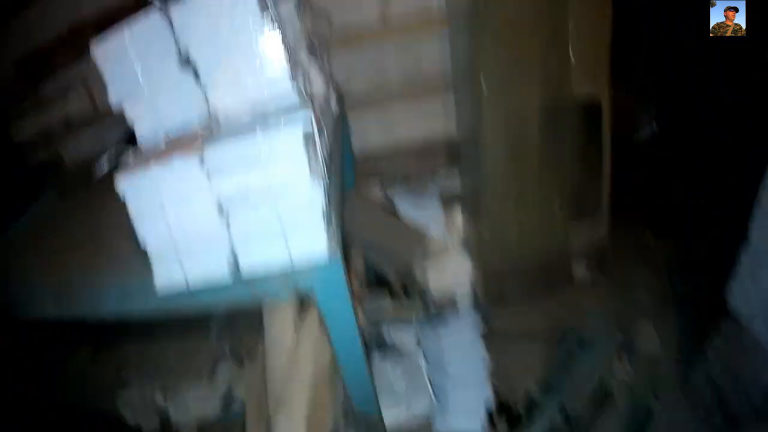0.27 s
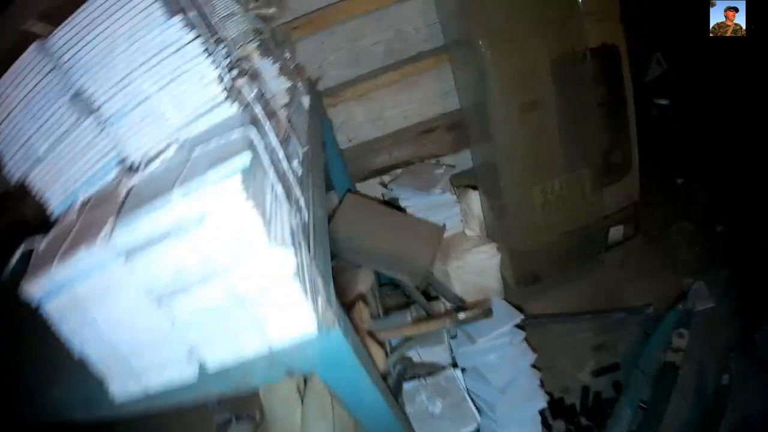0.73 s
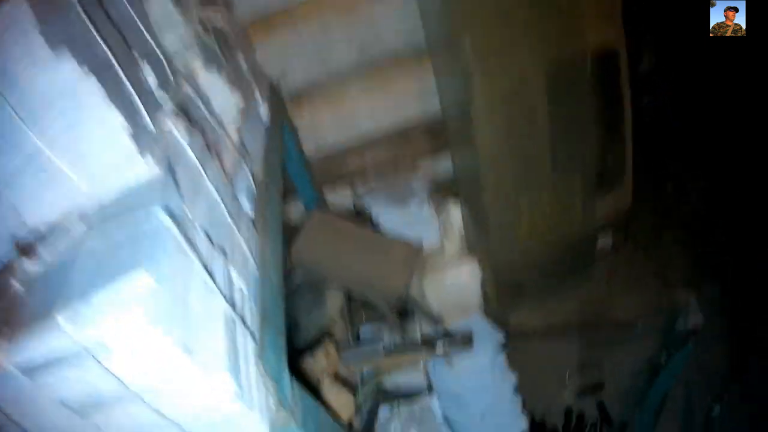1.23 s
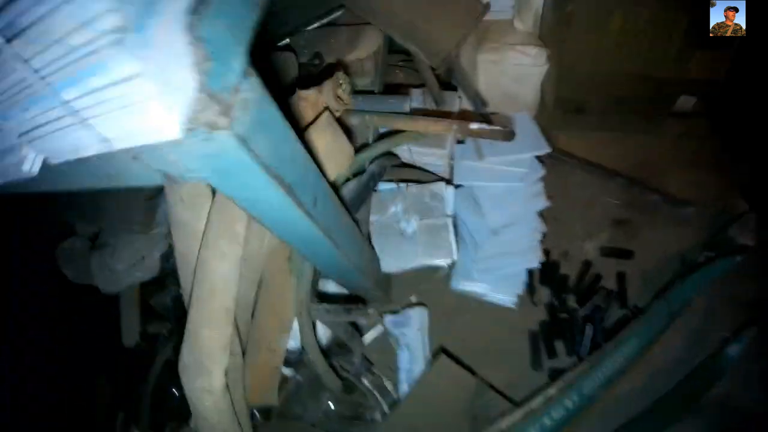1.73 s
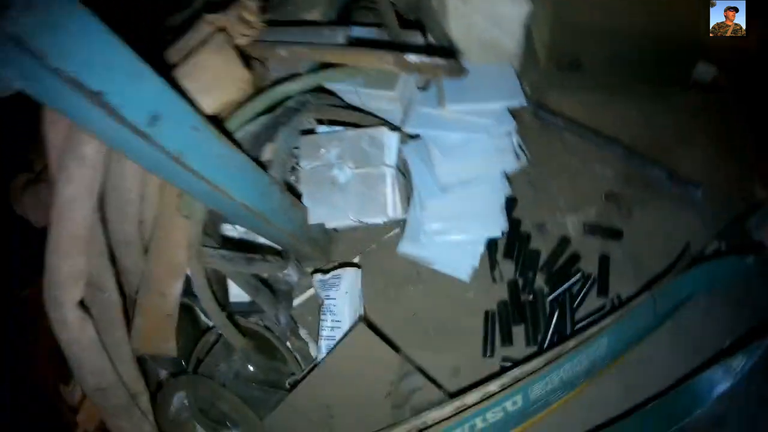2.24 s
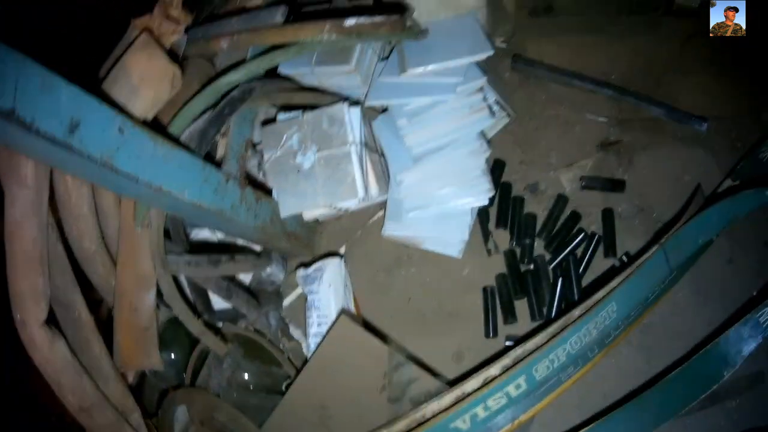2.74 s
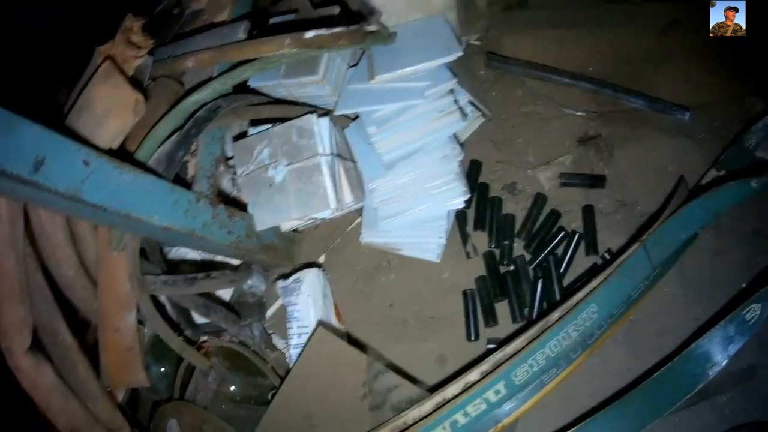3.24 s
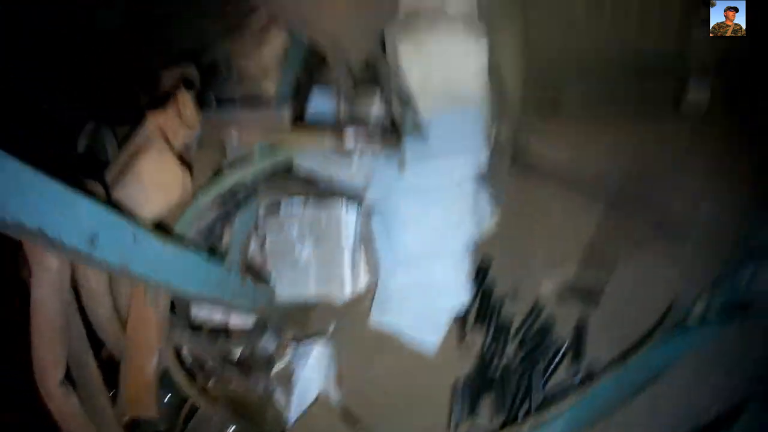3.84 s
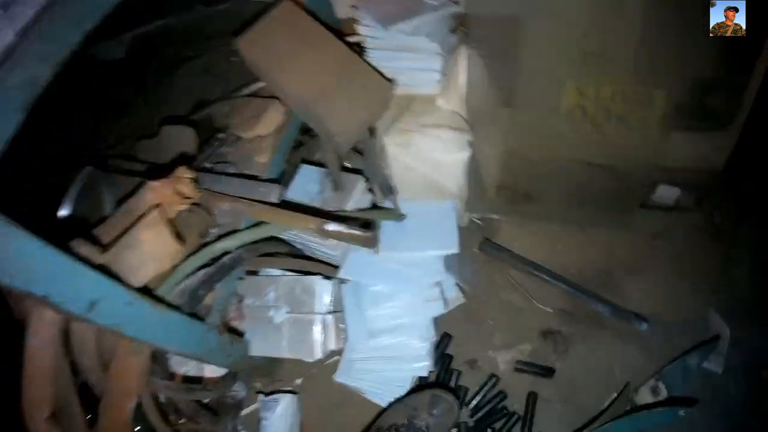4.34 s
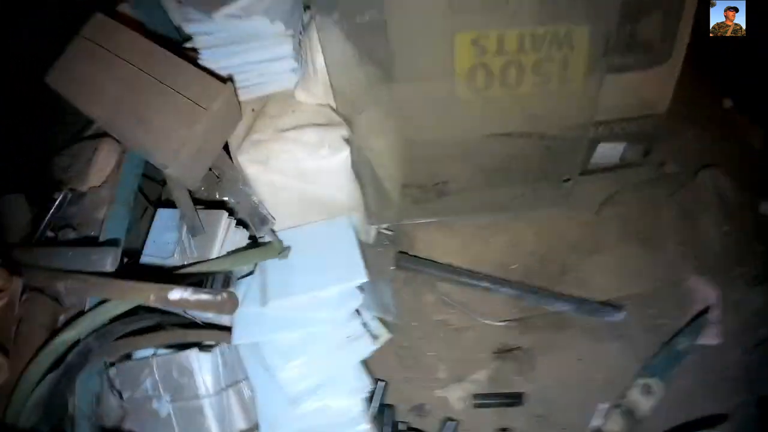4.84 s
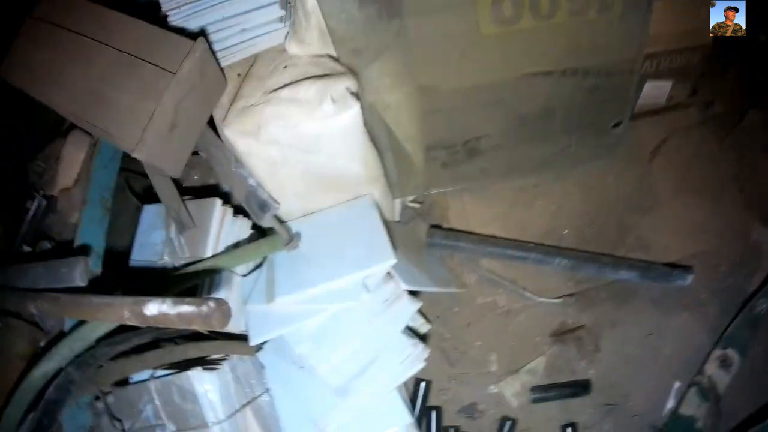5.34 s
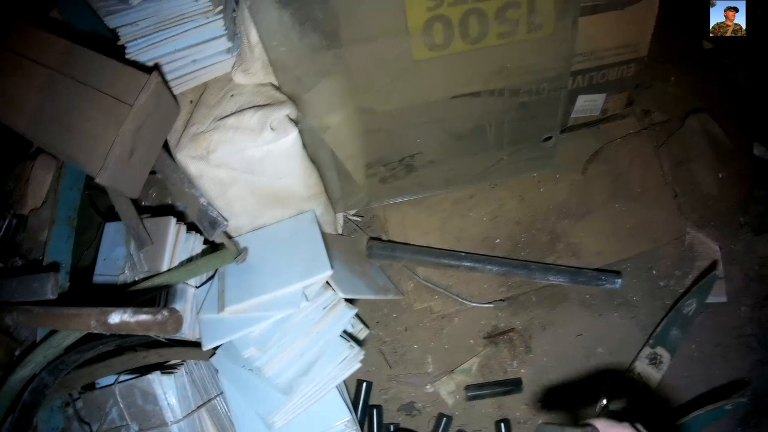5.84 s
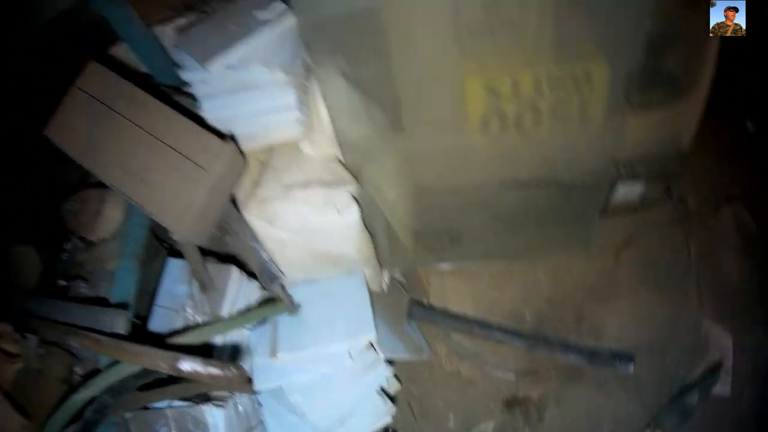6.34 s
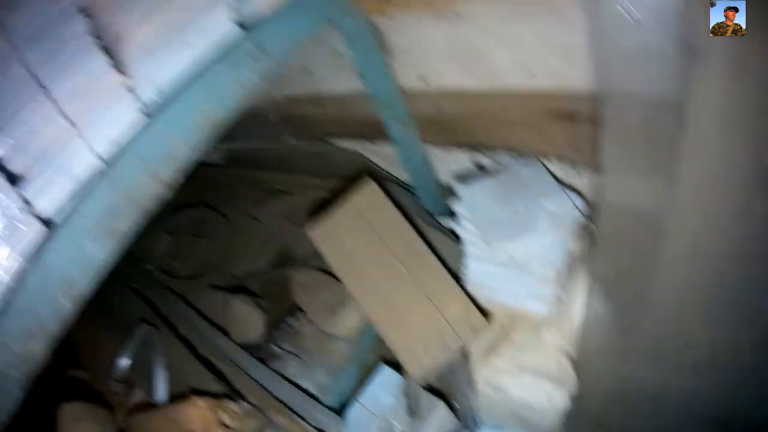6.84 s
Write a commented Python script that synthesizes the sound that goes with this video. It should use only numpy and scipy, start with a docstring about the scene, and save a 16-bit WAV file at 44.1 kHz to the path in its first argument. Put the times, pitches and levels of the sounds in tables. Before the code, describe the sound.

Gritty, stick-slip scraping and woody, boxy knocks from a pile of scrap, heard close in a cramped room with little echo. The opening is modest and scattered; a tight burst of knocks with a faint metallic ring follows around two seconds. After a long hush comes the loudest passage, a dense tumble of dragging and banging boards. It stops abruptly, and finally a small hard object clicks down and rattles weakly to rest.

```python
"""Boards and boxes drag in short, gritty strokes, knock together and tumble; metal clinks, a hard piece drops.
The place is a cramped storeroom with a pile of scrap, heard over faint still air.
Strokes are stick-slip noise under a shoving pressure; knocks are decaying noise bursts with odd resonances;
clinks and the heavy board are decaying sines; the dropped piece is a row of filtered clicks.
Clutter scatters each sound before it reaches two close microphone ports, and a short room tail follows."""
import sys
import numpy as np
from scipy import signal
from scipy.fft import rfft, irfft, next_fast_len
from scipy.io import wavfile

SR = 44100
rng = np.random.default_rng(int(sys.argv[2]) if len(sys.argv) > 2 else 0)


def file_out(sig):
    """Save sig as 16-bit WAV at sys.argv[1]."""
    # one column per channel
    cols = np.atleast_2d(sig).T
    # limit, then scale
    lim = np.clip(cols, -1, 1)
    pcm = np.round(lim * 32767).astype(np.int16)
    wavfile.write(sys.argv[1], SR, pcm)


N = 313110  # length [samples]

# Still air: (frequency [Hz], relative density [dB per Hz])
AIR_SPECTRUM = [(15, -30.5), (25, -3.5), (52, -4.5), (75, -8.5), (209, -14.5), (495, -16.5), (945, -18.5),
                (1110, -21), (1380, -22), (2360, -23), (15500, -26.5)]
AIR_DB = -60.5  # level of the air [dB]

# Shoves that drag something over the pile: (start [s], swell [s], length [s], relative rasp level [dB],
# drumming against the rasp before layer trims [dB], grit against the rasp before layer trims [dB])
STROKES = [(0.0, .07, 0.074, -49, 8, -6), (0.078, 0.019, 0.19, -34.5, -11.5, -2),
           (0.48, 0.012, .04, -62, -4, -2), (0.595, 0.024, 0.15, -36, -12, -7),
           (0.8, 0.014, 0.15, -57.5, 2.5, -10), (0.972, .035, 0.068, -42.5, -1.5, -2.5),
           (1.18, 0.078, 0.14, -62, -2.5, -6), (1.656, .012, 0.11, -71, 15, -5),
           (1.758, 0.0067, 0.042, -51, 1.5, 0), (1.85, 0.0079, 0.068, -46.5, -1, -9.5),
           (1.928, 0.018, 0.055, -25.5, -15.5, -13), (1.98, .015, 0.077, -26, -6, -4.5),
           (2.083, 0.0094, 0.024, -52.5, 9, -31), (2.3, 0.053, .13, -64.5, -2, -12),
           (3.78, 0.033, 0.049, -61, 4, -8), (4.285, 0.016, 0.037, -51, 1.5, -5.5),
           (4.342, .02, 0.13, -35.5, -10.5, -9), (4.447, .012, 0.069, -37, -14, -1.5),
           (4.55, 0.0096, 0.069, -35.5, -3.5, -4.5), (4.63, 0.013, 0.07, -18, -16, -6.5),
           (4.801, .015, 0.04, -31.5, -12, 3.5), (4.882, .02, 0.076, -49.5, -7, -1.5),
           (4.962, 0.023, 0.15, -45.5, -10.5, -2), (5.109, 0.053, 0.14, -37, -13, 0),
           (5.34, .025, 0.037, -35.5, -12, -4), (6.57, .1, 0.66, -64, 1.5, -10.5)]
# A load coming to rest, grit stopping first: (drum t60 [s], rasp t60 [s], grit t60 [s])
RELEASE_T60 = (0.38, .27, 0.18)
ARCH_DB = 3.5  # mid-shove effort over its ends [dB]
DRUM_LAG_S, GRIT_LAG_S = 0.012, 0.013  # delay of the drum and grit layers behind the rasp [s]
# Colours of the three dragging layers: (frequency [Hz], relative density [dB per Hz])
DRUM_COLOUR = [(40, -15.5), (110, -11.5), (172, 0), (250, -2), (420, -3.5), (700, -7), (2000, -51.5)]
RASP_COLOUR = [(150, -32), (400, -5), (650, -1.5), (1700, 1.5), (2800, -3.5), (5000, -13), (12000, -56)]
GRIT_COLOUR = [(1000, -31), (2800, -3), (4200, 2.5), (6300, -1), (9000, -9.5), (12000, -15), (15000, -18)]

# Blows among the scrap:
# (time [s], relative level [dB], hollow body [dB], hard edge [dB], ring t60 [s])
KNOCKS = [(0.0899, -24, 0.5, 5.5, 0.083), (0.149, -28, 15.5, 17, 0.024), (0.1716, -19.5, 6, 14, 0.066),
          (0.2219, -12.5, -1, -2.5, 0.14), (0.2975, -28, 10, -29, 0.17), (0.59, -31.5, -7, -3.5, 0.23),
          (0.66, -17.5, -16, 0.5, 0.086), (0.738, -29, 6.5, -6, 0.15), (0.9768, -27, 2.5, -12, 0.11),
          (1.932, -9, 1.5, -17.5, 0.041), (1.964, -8, -3, 1, 0.072), (1.993, -4.5, 5, 1.5, 0.085),
          (2.037, -9.5, -4.5, -6, 0.17), (2.25, -44, -25, 13.5, 0.14), (2.366, -47, 10, -11, 0.051),
          (4.353, -23.5, 6, -1.5, 0.13), (4.425, -10.5, 5.5, 1.5, 0.025), (4.455, -20.5, 5.5, 4.5, 0.079),
          (4.569, -12.5, -2, -2, 0.14), (4.627, -1.5, -16, -8.5, 0.12), (4.639, -9.5, 9, 12.5, 0.016),
          (4.6575, 0, -9.5, 3.5, 0.046), (4.6691, 2, -10.5, 1, 0.059), (4.79, -11, -4.5, -1, 0.06),
          (4.8044, -3.5, -13.5, 10, 0.012), (4.826, -15.5, -17, 0.5, 0.21), (4.893, -18, -8, -11, 0.019),
          (5.128, -27, 3.5, 0.5, 0.094), (5.199, -9, -11.5, -11, 0.018), (5.222, -14.5, -22, 9.5, 0.024),
          (5.267, -5.5, -4, 0, 0.015), (5.3452, -1, -15.5, 1, 0.014)]
# Overall colour of the blows: (frequency [Hz], relative density [dB per Hz])
KNOCK_COLOUR = [(30, -27.5), (100, -14.5), (230, -4), (480, 0), (760, 1.5), (1000, 1.5), (1700, 1),
                (3000, 0.5), (6000, -6), (15000, -33.5)]

# Partials of pipes and small hard parts: (time [s], frequency [Hz], relative level [dB], t60 [s])
CLINKS = [(.09, 5950, -30, 0.18), (0.224, 169.6, -34, 0.37), (1.296, 3436, -50.5, 0.12),
          (1.297, 5550, -56, 0.11), (1.764, 191, -32.5, 0.053), (1.935, 411, -27.5, 0.4),
          (1.966, 2330, -27, 0.065), (1.996, 803, -17.5, 0.21), (1.996, 211, -29, 0.34),
          (2.039, 1400, -33.5, .38), (2.04, 2554, -28.5, 0.22), (2.248, 2670, -56, 0.12),
          (2.252, 2865, -35.5, 0.04), (4.829, 1793, -26.5, 0.23), (6.287, 2620, -11.5, 0.015),
          (6.2873, 6160, -17.5, 0.029), (6.3595, 6280, -47, 0.017)]
# Landings of the heavy board: (time [s], relative level [dB])
BOARD_BLOWS = [(4.641, -17), (4.6597, -14), (4.671, -15.5)]
# Modes of that board: (frequency [Hz], relative level [dB], t60 [s])
BOARD_MODES = [(307, -9.5, .16), (404, -8.5, 0.41), (562, -5.5, .24), (736.6, 4, 0.08), (997, -8, 0.074),
               (1728, -8, 0.26), (1900, -7, .14), (2400, -7.5, .12), (3060, -16.5, 0.38), (4400, -9, .1)]

# Landings of a small hard piece: (time [s], relative strength [dB], top of the contact [Hz])
DROPS = [(6.2854, 17, 4200), (6.3599, 13, 6250), (6.4375, 11, 2500), (6.562, -11.5, 3200),
         (6.64, -5.5, 1600), (6.679, -9.5, 4070), (6.7037, -1.5, 5900), (6.746, -7.5, 1950)]
# Colour of the landings: (frequency [Hz], relative density [dB per Hz])
DROP_COLOUR = [(40, -27), (130, -5.5), (450, -5), (950, -0.5), (1500, -0.5), (2700, -3), (3700, -2),
               (4700, -9), (6200, -2.5), (7300, -18), (9000, -40), (15000, -45)]

# Decay of the storeroom: (frequency [Hz], t60 [s])
ROOM_T60 = [(100, 1), (260, 0.3), (700, .33), (1800, 0.17), (5000, .22), (14000, 0)]
# Strength of its echoes: (frequency [Hz], level [dB])
ROOM_DB = [(100, -8.5), (300, -8.5), (1500, -9.5), (5000, -14.5), (14000, -12)]
# Likeness of diffuse sound at the two ports: (frequency [Hz], correlation [0-1])
LIKENESS = [(30, 0.23), (130, 0.25), (700, 0.63), (1500, 1), (3000, 0.2), (14000, 0.018)]
# Shading of the left port: (frequency [Hz], left minus right [dB])
SHADE = [(100, -1), (700, 0.45), (1300, -0.1), (2400, -5), (4400, -5), (8000, -5), (14000, 3.5)]
CUTOFF_HZ = 15700  # the top is cut above this [Hz]


def from_db(db):
    """Decibels to amplitude gain."""
    return 10 ** (np.asarray(db) / 20)


def rms_one(x):
    """Scale to rms 1."""
    return x / np.sqrt(np.mean(x ** 2) + 1e-20)


def at_hz(points, hz):
    """Read a table on a log-frequency axis."""
    f, value = np.transpose(points)
    return np.interp(np.log(np.maximum(hz, 1)), np.log(f), value)


def seconds(length):
    """Time axis of a short sound [s]."""
    return np.arange(int(length * SR)) / SR


def add(track, s, sound):
    """Mix a sound in at a given time."""
    start = round(s * SR)
    track[..., start:start + sound.shape[-1]] += sound[..., :N - start]


def coloured(x, spectrum):
    """Causal (minimum-phase) filter with the given spectrum, folded from its cepstrum."""
    size = 2 * next_fast_len(x.shape[-1] // 2 + 2048)
    level_db = at_hz(spectrum, np.fft.rfftfreq(size, 1 / SR))
    cepstrum = irfft(np.log(from_db(level_db)))
    cepstrum[1:size // 2] *= 2
    cepstrum[size // 2 + 1:] = 0
    response = np.exp(rfft(cepstrum))
    return irfft(rfft(x, size) * response)[..., :x.shape[-1]]


def drift(corner_hz):
    """Slow random wandering of rms 1: noise through two equal one-pole low-passes."""
    r = np.exp(-2 * np.pi * corner_hz / SR)
    wander = signal.lfilter([1], [1, -2 * r, r * r], rng.standard_normal(N + SR))
    return rms_one(wander[SR:])  # the first second settles the filter


def diffuse(size):
    """White noise from all sides: how alike the ports are varies with frequency, least in the top treble."""
    mid, side = rfft(rng.standard_normal((2, size)))
    alike = np.clip(at_hz(LIKENESS, np.fft.rfftfreq(size, 1 / SR)), 0, 1)
    shared = np.sqrt((1 + alike) / 2) * mid
    opposed = np.sqrt((1 - alike) / 2) * side * [[1], [-1]]
    return irfft(shared + opposed, size)


def resonant(x, low_hz, high_hz, q, boost, count):
    """An odd piece of scrap stresses its own pitches, one drawn at random in each equal slice of the range."""
    steps = (np.arange(count) + rng.random(count)) / count
    pitches = low_hz * (high_hz / low_hz) ** steps  # slices are equal in log frequency
    return x + boost * sum(signal.lfilter(*signal.iirpeak(hz, q, fs=SR), x) for hz in pitches)


def placed(x, scatter_db=-2, scatter_t60=0.018, scatter_hz=1200, lag_s=0.00009):
    """One spot in the pile: direct sound and quick scatter off the clutter, at both ports.

    Rows: left port, right port, and the sound that fills the room.
    """
    decay = from_db(-60 * seconds(0.04) / scatter_t60)
    high_pass = signal.butter(1, scatter_hz, "high", fs=SR, output="sos")
    scatter = signal.sosfilt(high_pass, diffuse(len(decay)) * decay)
    paths = from_db(scatter_db) * scatter / np.linalg.norm(decay)
    paths[0, round(lag_s * SR)] += 1  # the direct sound reaches the left port late
    paths[1, 0] += 1
    ports = signal.fftconvolve(x[None], paths, axes=1)[:, :len(x)]
    return np.vstack([ports, x])


def still_air():
    """Faint steady air: coloured noise arriving from all sides."""
    return rms_one(coloured(diffuse(N), AIR_SPECTRUM))


def shove(swell, length, release_t60):
    """Pressure of one stroke: it builds up, arches while the load slides, then dies away."""
    t = seconds(length + 0.5)
    along = np.minimum(t / length, 1)
    arch = ARCH_DB * (np.sin(np.pi * along) - 0.5)
    release = -60 * np.maximum(t - length, 0) / release_t60
    return np.minimum(t / swell, 1) * from_db(arch + release)


def friction(colour, slips_per_s, size_db, judder_db, hiss, count=3):
    """Stick and slip at a few contact points, each with its own wandering load and resonances."""
    out = 0
    for _ in range(count):
        slipped = rng.random(N) < slips_per_s / SR
        signs = rng.choice([-1, 1], N)
        sizes = from_db(size_db * np.minimum(rng.exponential(1, N), 4)) * signs
        load = from_db(judder_db * np.tanh(drift(25)))
        slips = (rms_one(slipped * sizes) + hiss * rng.standard_normal(N)) * load
        contact = resonant(slips, low_hz=255.7, high_hz=12660, q=26, boost=1.6, count=10)
        out = out + placed(contact)
    return rms_one(coloured(out, colour))


def scrapes(drum_db=-2, rasp_db=-1, grit_db=2):
    """A dragged board drums, its edge rasps, and dirt grinds under it."""
    pressure = np.zeros((3, N))  # drum, rasp, grit
    lags = (DRUM_LAG_S, 0, GRIT_LAG_S)
    for s, swell, length, level_db, hollow_db, dirt_db in STROKES:
        for layer, db, lag, t60 in zip(pressure, (hollow_db, 0, dirt_db), lags, RELEASE_T60):
            add(layer, s + lag, from_db(level_db + db) * shove(swell, length, t60))
    drum = friction(DRUM_COLOUR, slips_per_s=170, size_db=5.0, judder_db=6.0, hiss=0.35, count=2)
    rasp = friction(RASP_COLOUR, slips_per_s=300, size_db=0.0, judder_db=7.5, hiss=0.25)
    grit = friction(GRIT_COLOUR, slips_per_s=690, size_db=2.5, judder_db=8.5, hiss=0.52)
    drumming = from_db(drum_db) * pressure[0] * drum
    rasping = from_db(rasp_db) * pressure[1] * rasp
    grinding = from_db(grit_db) * pressure[2] * grit
    return drumming + rasping + grinding


def knocks(crack=0.067, crack_s=0.0019, body_hz=500, middle_hz=1400, edge_hz=5500):
    """Each blow is a crack, then the crowded modes of a board or box dying away as noise."""
    out, t = np.zeros((3, N)), seconds(0.2)
    for s, level_db, body_db, edge_db, t60 in KNOCKS:
        decay = from_db(-60 * t / t60)
        blow = rng.standard_normal(len(t)) * decay * (1 + crack * np.exp(-t / crack_s))
        blow[0] += 6 * np.exp(-t60 / 0.02)  # the shorter the ring, the stronger the first click
        blow = resonant(blow, low_hz=309.5, high_hz=11750, q=34, boost=0.71, count=11)
        hardness = [(body_hz, body_db), (middle_hz, 0), (2 * middle_hz, 0), (edge_hz, edge_db)]
        add(out, s, from_db(level_db) * placed(coloured(blow, hardness)))
    return coloured(out, KNOCK_COLOUR)


def ring(hz, db, t60):
    """One struck mode: a sine that decays exponentially."""
    t = seconds(0.5)
    return from_db(db - 60 * t / t60) * np.sin(2 * np.pi * hz * t)


def ringing_parts():
    """Loose parts clink; the heavy board booms each time it lands, as a sum of its modes."""
    out = np.zeros(N)
    for s, hz, db, t60 in CLINKS:
        add(out, s, ring(hz, db, t60))
    # neighbouring modes start with opposite signs
    board = sum(ring(hz, db, t60) * (-1) ** k for k, (hz, db, t60) in enumerate(BOARD_MODES))
    for s, db in BOARD_BLOWS:
        add(out, s, from_db(db) * board)
    return out


def drops(chatter=0.5, chatter_t60=0.016):
    """A small piece bounces: each landing is a click with brief chatter, low-passed by its contact."""
    out, decay = np.zeros((3, N)), from_db(-60 * seconds(0.06) / chatter_t60)
    for s, db, top_hz in DROPS:
        click = chatter * rng.standard_normal(len(decay)) * decay / np.linalg.norm(decay)
        click[0] += 1
        click = signal.sosfilt(signal.butter(3, top_hz, fs=SR, output="sos"), click)
        add(out, s, from_db(db) * placed(click))
    return coloured(out, DROP_COLOUR)


def storeroom(x, build_s=0.0045):
    """A short room tail, longest in the bass, made of decaying noise bands; the left port is shaded."""
    t = seconds(0.56)
    noise, echoes = diffuse(len(t)), 0
    edges = np.geomspace(50, 18000, 10)
    for k, (low, high) in enumerate(zip(edges, edges[1:])):
        hz = np.sqrt(low * high)
        decay = from_db(-60 * t / at_hz(ROOM_T60, hz)) * (1 - np.exp(-t / build_s))
        band_pass = signal.butter(2, [low, high], "band", fs=SR, output="sos")
        # alternating signs let neighbouring bands join without a notch
        band = (-1) ** k * signal.sosfilt(band_pass, noise)
        echoes = echoes + from_db(at_hz(ROOM_DB, hz)) * band * decay / np.linalg.norm(decay)
    left, right = x[:2] + signal.fftconvolve(x[2:], echoes, axes=1)[:, :N]
    # each port takes half of the difference
    left = coloured(left, [(hz, db / 2) for hz, db in SHADE])
    right = coloured(right, [(hz, -db / 2) for hz, db in SHADE])
    return np.array([left, right])


def scene(knock_db=-1.0, ring_db=0, drop_db=-2, air_db=0):
    """The pile in its storeroom, over faint still air."""
    pile = from_db(knock_db) * knocks() + scrapes()
    pile = pile + from_db(ring_db) * placed(ringing_parts())
    pile = pile + from_db(drop_db) * drops()
    return storeroom(pile) + from_db(AIR_DB + air_db) * still_air()


def record(dry):
    """The loudest peaks are rounded off, then the top is cut by a steep low-pass."""
    low_pass = signal.ellip(10, 0.1, 70, CUTOFF_HZ, fs=SR, output="sos")
    return signal.sosfilt(low_pass, np.tanh(dry))


dry = scene()
out = record(dry)
file_out(out)
```